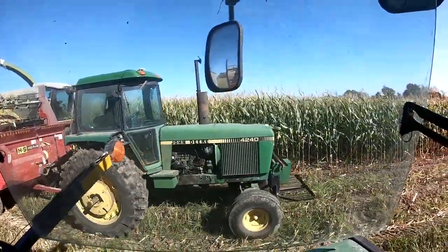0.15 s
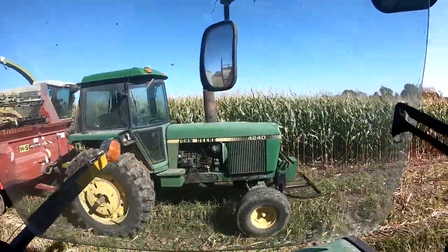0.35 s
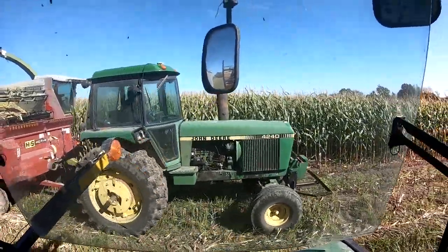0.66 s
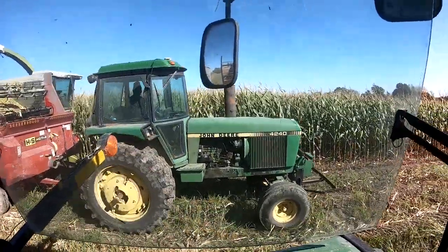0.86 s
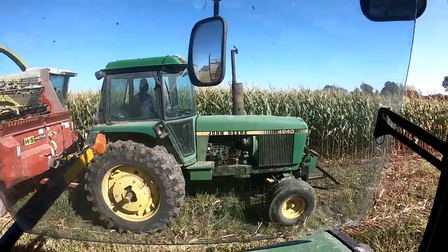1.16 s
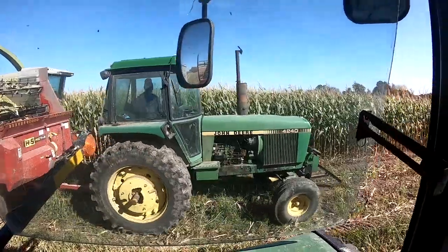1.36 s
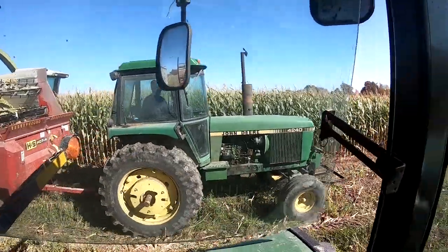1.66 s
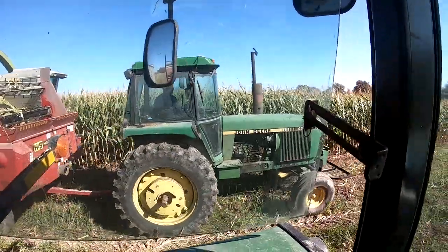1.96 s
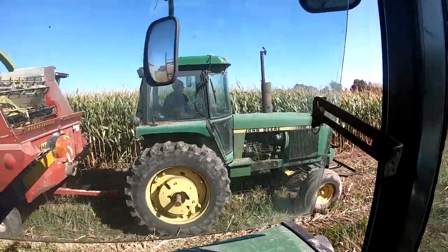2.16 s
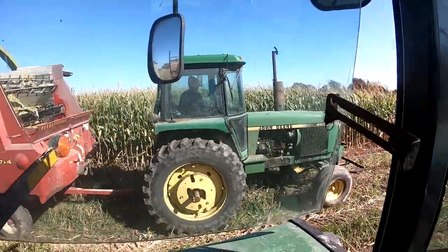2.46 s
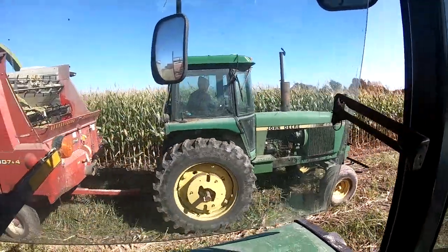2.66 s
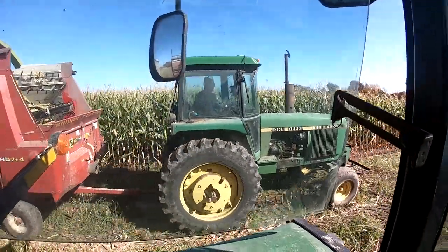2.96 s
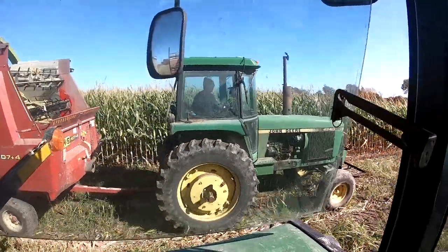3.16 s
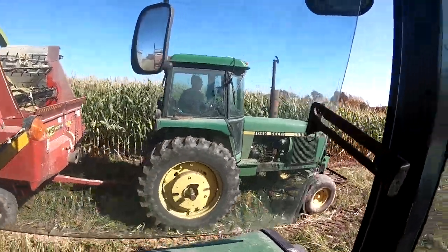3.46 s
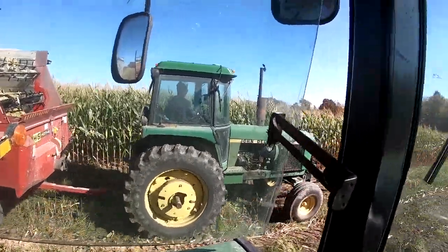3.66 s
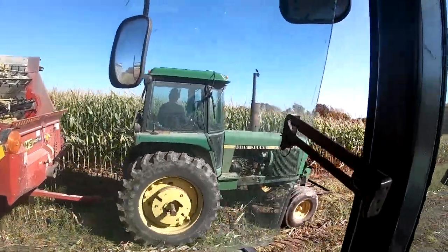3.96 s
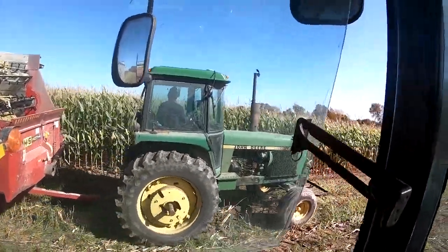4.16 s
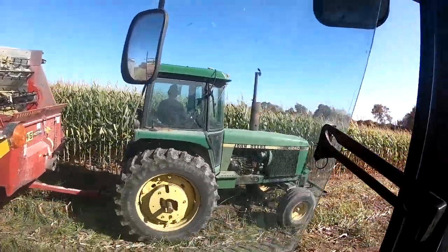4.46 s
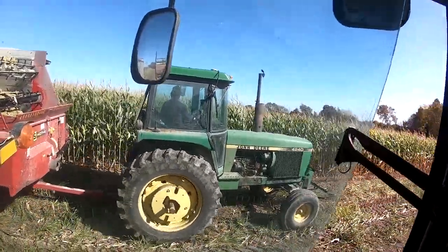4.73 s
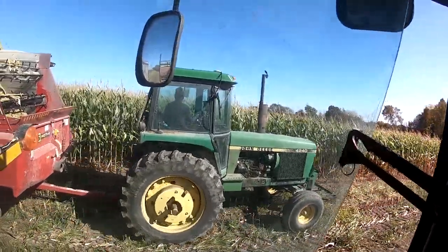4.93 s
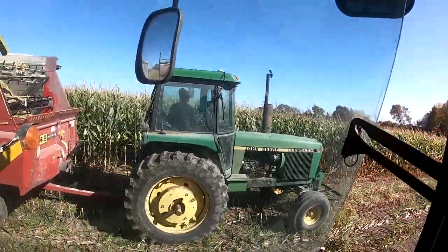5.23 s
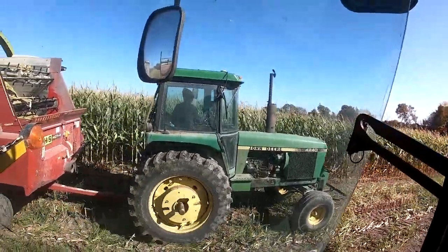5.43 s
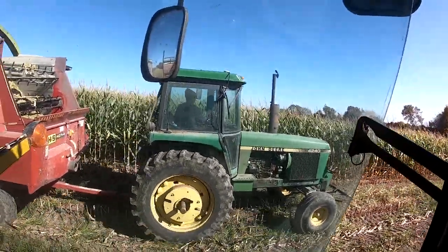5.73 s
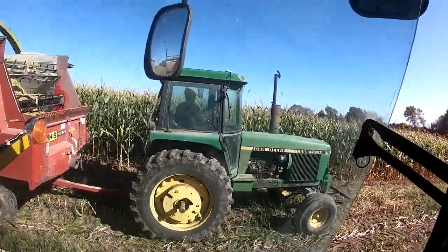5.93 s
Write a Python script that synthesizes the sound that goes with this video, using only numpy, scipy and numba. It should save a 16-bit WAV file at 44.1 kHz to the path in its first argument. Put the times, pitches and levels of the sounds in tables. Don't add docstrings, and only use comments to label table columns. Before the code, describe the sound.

Heard inside a tractor cab beside a working forage harvester in a corn field, in stereo with dulled extreme treble. From 0 s a deep diesel boom near 44 Hz dominates over a wavering cutter drone near 186 Hz, a faint second engine, surging panel hum and broad fan and crop roar. From 0.15 to 1.4 s dry joints give tiny squeaks and loose metal clacks sharply, thickest around 0.4-0.55 s and again near 0.9 and 1.1 s; faint clanking rubs follow near 1.75 s. At about 1.9-2.2 s the engine sags to 37 Hz, its boom cutting out briefly. It labours until 3.3 s, then climbs quickly, passing its first speed at 3.5 s and reaching 50 Hz by 4.7 s. From 4.4 s a whine near 966 Hz emerges; roar and throbbing housing ring grow, loudest around 5.4 s, continuing to 6 s with only rare soft knocks.

```python
import sys
import numpy as np
from scipy import signal
from scipy.fft import rfft, irfft
from scipy.io import wavfile
from scipy.ndimage import uniform_filter1d
from numba import njit

SR = 44100
rng = np.random.default_rng(int(sys.argv[2]) if len(sys.argv) > 2 else 0)


def invert_db(x):
    u = np.asarray(x, float) / 20
    return 10 ** u


def store_pcm(level_fs):
    pcm = np.round(np.clip(level_fs, -1, 1) * 32767).astype(np.int16)
    wavfile.write(sys.argv[1], SR, np.atleast_2d(pcm).T)


N = 268569
T = np.arange(N) / SR
CRUISE_HZ = 44.5

# t/s, firing rate f/Hz, boom level/dB
ENGINE = [(0, 43.92, -14.5), (.55, 43.8, -15.5), (.8, 44.23, -15.5), (.95, 44.1, -14), (1.17, 43.96, -13.5),
          (1.42, 43.85, -17), (1.75, 43.57, -15), (1.92, 42.1, -17), (2.03, 37.42, -16),
          (2.4, 36.76, -12.5), (2.55, 38.16, -15.5), (3.15, 38.73, -15), (3.44, 40.82, -13.5),
          (3.55, 44.98, -14.5), (3.83, 45.1, -16), (3.93, 48.1, -14.5), (4.7, 50.6, -16.5),
          (6.09, 50.2, -17.5)]


def unit(x):
    return x / np.sqrt(np.mean(x ** 2))


def curves(table):
    s, *columns = np.transpose(table)
    return [np.interp(T, s, c) for c in columns]


def at(table, hz):
    f, v = np.transpose(table)
    return np.interp(np.log(hz + 1), np.log(f + 1), v)


def bump(s, half):
    return np.exp(-((T - s) / half) ** 2)


@njit
def svf(x, hz, width):
    y, b, l = np.empty(len(x)), 0., 0.
    g, k = np.tan(np.pi * hz / SR), width / hz
    for i in range(len(x)):
        v = (b + g * (x[i] - l)) / (1 + g * (g + k))
        b, l, y[i] = 2 * v - b, l + 2 * g * v, k * v
    return y


def walk(rate):
    k = int(SR / rate)
    held = np.repeat(rng.standard_normal(N // k + 1), k)
    return 1.33 * uniform_filter1d(uniform_filter1d(held, k), k)[:N]


def tone(turns, db, flutter_db, slip):
    phase = 2 * np.pi * turns + slip * walk(8) + 6 * rng.random()
    return np.sqrt(2) * invert_db(db + flutter_db * walk(12)) * np.sin(phase)


def pan(x, left_db):
    return x * invert_db(np.array([[left_db], [-left_db]]) / 2)


def engine():
    orders = [(1.5, -31, 0.7), (2, -22, 0.13), (3, -25, -.5), (4, -27, -2.3)]
    # t/s, half width/s, depth/dB
    boom_dips = [(0.049, 0.018, -4), (.24, 0.024, -3), (.74, 0.018, -3.5), (1.0, 0.018, -10),
                 (1.94, 0.024, -7.5), (2.015, 0.025, -15), (2.205, 0.018, -23), (2.48, 0.023, -3),
                 (2.61, 0.024, -5.5), (3.54, .025, -3), (3.731, 0.02, -3), (3.89, 0.028, -4),
                 (4.75, .02, -3.5), (5.16, 0.018, -2), (5.86, 0.012, -7)]
    hz, db = curves(ENGINE)
    turns = np.cumsum(hz) / SR
    dips_db = sum(depth_db * bump(s, half) for s, half, depth_db in boom_dips)
    out = tone(turns, db + dips_db, flutter_db=1.0, slip=0.083)
    labour_db = -.8 * np.minimum(hz - CRUISE_HZ, 0)
    over_hz = np.maximum(hz - CRUISE_HZ, 0)
    for k, under_db, slope in orders:
        out += tone(k * turns, db + under_db + labour_db + slope * over_hz, flutter_db=2.5, slip=0.11)
    return out


def drum():
    # t/s, knife rate f/Hz
    speed = [(0, 186.5), (.6, 186.6), (1.2, 189.7), (1.8, 186.3), (2.1, 185), (2.9, 186.9), (3.9, 185.2),
             (6.09, 186.9)]
    # start level/dB, end level/dB
    resting = [(-38, -41.5), (-47, -40.5), (-48.5, -48.5), (-46, -46)]
    # t/s, multiple that swells, half width/s, rise/dB
    bites = [(.15, 1, 0.2, 5), (.6, 1, 0.35, 4.5), (1.2, 1, 0.27, 5.5), (1.65, 1, 0.071, 9.5),
             (1.98, 1, 0.13, 13.5), (2.2, 1, 0.095, 7), (2.4, 1, 0.044, 9), (2.8, 1, 0.26, 6),
             (3.2, 1, .15, -1), (3.79, 1, 0.06, 13), (4.0, 1, 0.068, 8), (4.33, 1, 0.072, 7.5),
             (4.62, 1, 0.058, 9), (4.9, 1, .1, 10), (5.36, 1, 0.082, 6), (5.62, 1, 0.15, 10.5),
             (5.88, 1, 0.058, 11), (1.9, 2, .2, 3.5), (2.27, 2, 0.093, 6.5), (2.55, 2, 0.083, 9.5),
             (2.85, 2, 0.15, 6.5), (3.3, 2, 0.15, 6.5), (3.9, 2, 0.08, 7), (4.13, 2, 0.079, 5),
             (4.61, 2, .05, 7), (5.03, 2, 0.12, 12), (5.2, 2, 0.061, 9.5), (5.42, 2, 0.099, 8.5),
             (5.75, 2, 0.11, 9), (.55, 3, 0.34, 9), (1.57, 3, 0.068, 12.5), (2.1, 3, 0.44, 7),
             (3.3, 3, 0.098, 7.5), (4.55, 3, 0.14, 5), (5.05, 3, 0.091, 6), (5.42, 3, 0.097, 3),
             (.3, 4, 0.11, 9.5), (.7, 4, 0.28, 8), (1.05, 4, 0.18, -1), (1.38, 4, .08, 4),
             (1.8, 4, 0.14, 11), (2.04, 4, 0.075, 11), (2.2, 4, 0.052, 6), (2.42, 4, 0.051, 9),
             (2.8, 4, 0.23, 5.5), (3.1, 4, 0.11, 7.5), (3.88, 4, .07, 6.5), (4.15, 4, 0.11, 11),
             (4.48, 4, 0.067, 7), (5.45, 4, 0.15, 9), (5.75, 4, 0.065, 7.5), (5.97, 4, .08, 10)]
    turns = np.cumsum(curves(speed)[0]) / SR
    out = 0
    for k, ends in enumerate(resting):
        db = np.linspace(*ends, N) + 2.28 * walk(30)
        db += sum(rise_db * bump(s, half) for s, m, half, rise_db in bites if round(m) == k + 1)
        out = out + pan(tone((k + 1) * turns, db, flutter_db=1.54, slip=0.38 + 0.22 * k), -.7 * k)
    return out


def second_diesel():
    return tone(108.7 * T, np.linspace(-34, -30, N) + 1.5 * walk(5.9), flutter_db=1.5, slip=0.058)


def shaft_shake():
    return tone(31.1 * T, -37 + 2.5 * walk(2.9), flutter_db=2.0, slip=1.04)


def blower():
    # t/s, rise/dB, hum f/Hz
    surges = [(0, 17, 131.3), (.27, 11, 131.2), (.51, 6.5, 136.6), (.78, 12, 138.8), (.92, 9, 133),
              (1.09, 14.5, 142), (1.36, 11, 139.2), (1.59, 9, 139.3), (1.74, 6, 138.6), (1.89, 15, 138.1),
              (2.07, 13, 138), (2.22, 8.5, 132.2), (2.36, 9, 137.6), (2.6, 9, 133.8), (2.74, 11.5, 137.8),
              (2.99, 9, 139.3), (3.15, 4.5, 138.6), (3.6, 2.5, 141), (3.87, 9, 137.1), (4.05, 8, 130.1),
              (4.182, 10.5, 139.6), (4.32, 9, 139), (4.52, 7, 138.5), (4.66, 6.5, 137), (4.78, 9.5, 136.2),
              (4.9, 11.5, 137), (5.07, 5, 137.9), (5.29, 9, 137.9), (5.42, 11, 137.8), (5.6, 5, 137.6),
              (5.78, 9, 135.7), (5.9, 7.5, 136.6), (6.09, 0, 131.9)]
    surge_s = 0.069
    db = np.linspace(-43.5, -29, N) + sum(rise_db * bump(s, surge_s) for s, rise_db, _ in surges)
    return tone(np.cumsum(curves(surges)[1]) / SR, db, flutter_db=1.06, slip=0.4)


def gears():
    # f/Hz, bandwidth/Hz, start level/dB, end level/dB
    lines = [(242.5, 11.3, -42, -35.5), (296, 3.4, -42.5, -49.5), (306, 3.6, -49, -48),
             (325, 7.8, -50.5, -43.5), (1126, 6, -46.5, -47.5)]
    mesh_hz, idle_db, loaded_db = 966, -61, -42
    bites_s, rise_s, throb_s = 4.406, 0.11, 0.58
    db = idle_db + (loaded_db - idle_db) / (1 + np.exp((bites_s - T) / rise_s))
    db += 1.2 * walk(33) + 1.7 * np.cos(2 * np.pi * (T - 4.7) / throb_s)
    out = pan(tone(mesh_hz * T, db, flutter_db=0.5, slip=0.92), -2.5)
    for hz, width, start_db, end_db in lines:
        out += invert_db(np.linspace(start_db, end_db, N)) * unit(svf(rng.standard_normal(N), hz, width))
    return out


def roar():
    # t/s, level/dB
    swell = [(0, -33), (1.04, -33.5), (1.37, -33), (1.8, -33), (2.36, -33), (2.7, -35), (3.3, -34.5),
             (3.68, -35.5), (4, -31.5), (4.7, -31), (5.4, -28.5), (6.09, -29.5)]
    # f/Hz, spectral level/(dB per Hz)
    colour = [(10, -58), (20, -57), (28, -48.5), (60, -62.5), (120, -50.5), (210, -57), (300, -62),
              (450, -64), (750, -62), (1300, -65), (2500, -71), (3600, -77), (4200, -81), (8500, -86),
              (9800, -93), (11200, -107), (13500, -113), (15000, -128)]
    # f/Hz, share 0-1
    likeness = [(200, 1), (400, 0.84), (600, 0.71), (1000, 0.18), (1500, 0.43), (3500, 0.7), (4500, 0.54),
                (6500, 0.26), (10500, 0.24), (13000, 0.1)]
    # f/Hz, left over right level/dB
    left_more = [(60, 4), (110, 4.5), (190, -1), (340, -0.5), (600, -2.0), (1060, -3.5), (1880, -2.5),
                 (3340, -2.5), (5930, 1.5), (10500, -1.5)]
    shaft_hz = 15.55
    top_follows = 0.83
    hz = np.fft.rfftfreq(N, 1 / SR)
    one, other = (rfft(rng.standard_normal(N)) for _ in range(2))
    like = np.clip(at(likeness, hz), 0, 1)
    right = like * one + np.sqrt(1 - like ** 2) * other
    side_db = at(left_more, hz) / 2
    pair = np.array([one * invert_db(side_db), right * invert_db(-side_db)]) * invert_db(at(colour, hz))
    scale = np.sqrt(np.mean(irfft(pair * (hz > 400) * (hz < 1400), N) ** 2))

    level_db, = curves(swell)
    engine_hz = curves(ENGINE)[0]
    labour_hz = np.maximum(CRUISE_HZ - engine_hz, 0)
    presence_db = 0.32 * labour_hz + (top_follows - 1) * level_db
    treble_db = 0.29 * labour_hz + (top_follows - 1) * level_db
    firing = np.cos(2 * np.pi * np.cumsum(engine_hz) / SR)
    beat = np.cos(np.pi * shaft_hz * T + .4 * walk(2)) ** 6
    grit = walk(40)
    out = 0
    for centre in 11.25 * 2 ** np.arange(0, 11, .5):
        window = np.cos(np.pi * np.clip(np.log2(hz / centre + 1e-9), -.5, .5)) ** 2
        high = np.clip(np.log2(centre / 1200) / 1.7, 0, 1)
        low = np.clip(np.log2(centre / 80) / 3.8, 0, 1)
        db = low * level_db + (1 - low) * level_db.mean()
        tilt_db = presence_db if centre < 3800 else treble_db
        db = db + (centre > 1400) * (tilt_db - tilt_db.mean())
        db = db + 0.9 * (700 < centre < 2000) * firing
        db = db + high * (0.87 * grit + 0.63 * beat) + 0.46 * walk(9.3)
        out = out + invert_db(db) * irfft(pair * window, N) / scale
    return out


def housing():
    # f/Hz, bandwidth/Hz, start level/dB, end level/dB
    resonances = [(1021, 120, -60, -39.5), (1320, 126, -43.5, -53), (2368, 275, -49, -51)]
    cylinders, peak_s = 6, 5.72
    turns = np.cumsum(curves(ENGINE)[0]) / SR
    cycle = 2 * np.pi * (turns - turns[int(peak_s * SR)]) / cylinders
    throb_db = 6 * np.cos(cycle) + 3 * np.cos(cylinders * cycle)
    out = 0
    for hz, width, start_db, end_db in resonances:
        knocks = rng.standard_normal((2, N)) * (rng.random(N) < .02)
        knocks *= invert_db(1.4 * rng.exponential(size=N))
        ring = []
        for k in (knocks[0], 0.5 * knocks[0] + knocks[1]):
            for spread in (1, 1.9, 1.9):
                k = svf(k, hz, spread * width)
            ring.append(unit(k))
        db = np.linspace(start_db, end_db, N) + throb_db + 1.2 * walk(18)
        out = out + np.array(ring) * invert_db(db)
    return pan(out, -1.9)


def squeaks():
    # t/s, length/s, f/Hz, level/dB, octave level/dB
    slips = [(0.152, 0.022, 2285, -28.5, -31), (.375, 0.012, 8000, -42, -34),
             (0.4815, 0.010, 1780, -26, -36), (0.494, 0.014, 1855, -27.5, -36),
             (0.506, 0.016, 1820, -33, -38), (1.034, 0.068, 1330, -33, -31), (0.546, 0.018, 7900, -39, -27),
             (0.955, 0.016, 1320, -27, -12), (1.246, 0.018, 6480, -35.5, -40),
             (1.253, 0.016, 3280, -33.5, -32), (1.781, 0.031, 1620, -28.5, -26),
             (2.14, 0.076, 7850, -43, -36)]
    out = np.zeros(N)
    for s, length, hz, db, octave_db in slips:
        t = np.arange(int(length * SR)) / SR
        jitter = np.cumsum(0.12 * uniform_filter1d(rng.standard_normal(4410), size=16))[:len(t)]
        phase = 2 * np.pi * hz * t + jitter
        shape = np.abs(np.sin(np.pi * (t / length) ** 0.71)) ** 0.76
        wave = np.sin(phase) + invert_db(octave_db) * np.sin(2 * phase)
        out[int(s * SR):int(s * SR) + len(t)] += invert_db(db) * shape * wave
    return pan(out, -2.5)


def clacks():
    # t/s, peak level/dB, thud under 1.5 kHz/dB, clank 1.5-3 kHz/dB, ring of the struck part f/Hz
    blows = [(0.154, -36, 3, 7, 6000), (.2268, -23.5, -5, -1, 6700), (.4215, -18, -10, -11, 6560),
             (.4345, -29, -2, -7, 6000), (.4808, -18, -10, -13, 7800), (.4875, -28, 2, 1, 4600),
             (.4975, -38, -3, 2, 7800), (.5045, -36, -1, 2, 5000), (.5461, -34, 5, -4, 7750),
             (.6294, -41, 4, -2, 7000), (0.87, -23, -8, -11, 7300), (.8894, -31, 2, 2, 7400),
             (1.0975, -26, -4, -7, 5900), (1.1101, -24, 4.5, -11, 7700), (1.1155, -29.5, 7, -2, 7200),
             (1.124, -38, 3, 0, 8500), (1.132, -36, 6, 2, 7000), (1.2506, -31, -6, -8, 9800),
             (1.31, -41, -3, -7, 7000), (1.3696, -39.5, -3, 12.5, 7000), (1.5746, -39.5, -11, 10.5, 7000),
             (1.7555, -41, 13, 12, 4400), (1.778, -46, 5, 12, 4400), (2.4219, -41, 7, 1, 5623),
             (3.2289, -36, 6, -5, 5695), (4.0527, -42, 6, -5, 5254), (5.4896, -36, 6, 1, 6960)]
    # t at the middle/s, half width/s, peak level/dB, clank/dB, ring f/Hz
    scrapes = [
        (.491, 0.0059, -32.5, 5.5, 4940),
        (1.107, 0.014, -34, -5, 6500),
        (.911, 0.011, -37.5, 2, 7640),
        (1.148, 0.013, -40.5, 0, 7500),
        (1.73, 0.0069, -41, -3, 5970),
        (1.79, 0.02, -44, 13.5, 4400),
        (2.125, 0.022, -47, 13.5, 4150),
        (2.335, 0.019, -43.5, 4, 4470),
    ]
    # f/Hz, bandwidth/Hz, level/dB
    body_modes = [(740, 140, 8), (1140, 230, 2), (1790, 280, 5.5), (2720, 710, -1), (3780, 1500, -6),
                  (4700, 500, -12), (6700, 4400, 0.5), (7900, 690, -13), (9800, 1600, -16)]
    out = np.zeros((2, N))
    t = np.arange(8000) / SR
    decay = 1000. ** (-t / 0.035) + invert_db(-12.5) * 1000. ** (-t / 0.16)
    blow = (1 - np.exp(-(t / 0.0025) ** 1.6)) * decay
    events = [(*row, blow) for row in blows]
    for s, half, db, clank_db, hz in scrapes:
        events.append((s - 2 * half, db + 0.5, 0, clank_db, hz, np.exp(-(t / half - 2) ** 2)))
    for s, db, thud_db, clank_db, ring_hz, shape in events:
        knocks = invert_db(1.1 * np.repeat(rng.standard_normal(100), 80))
        burst = rng.standard_normal((2, len(t))) * knocks
        burst[1] = 0.49 * burst[0] + 0.68 * burst[1]
        top_db = 8 * min(ring_hz - 7300, 0) / 1000
        ring = 0
        for f, width, mode_db in body_modes + [(ring_hz, 900, -5)]:
            part_db = thud_db if f < 1500 else clank_db if f < 3000 else 0 if f < 6000 else top_db
            gain = invert_db(mode_db + 1.5 * rng.standard_normal() + part_db)
            ring = ring + gain * np.array([unit(svf(b, f, width)) for b in burst])
        out[:, int(s * SR):int(s * SR) + len(t)] += pan(ring * shape * invert_db(db - 9.5), -1)
    hz = np.fft.rfftfreq(N, 1 / SR)
    shade_db = at([(9500, 1.5), (11000, -7), (12500, -19), (15000, -23)], hz)
    return irfft(rfft(out) * invert_db(shade_db), N)


def scene():
    drone = engine() + drum() + second_diesel() + shaft_shake() + blower() + gears()
    return drone + roar() + housing() + squeaks() + clacks()


def roll_off(x):
    return signal.sosfilt(signal.butter(12, 15200, fs=SR, output="sos"), x)


def record(dry):
    # f/Hz, phase lead of the left port/rad
    left_lead = [(30, -.3), (44, -.23), (75, -.13), (190, -.04), (4000, 0), (5500, -.6), (7500, -1.6),
                 (9500, -2.9), (10800, -3.2), (12500, -5)]
    margin = SR // 10
    padded = np.pad(dry[1], margin, mode="reflect")
    lag = at(left_lead, np.fft.rfftfreq(len(padded), 1 / SR))
    right = irfft(rfft(padded) * np.exp(-1j * lag), len(padded))[margin:][:N]
    ports = np.array([dry[0], right])
    return roll_off(np.tanh(.8 * ports) / .8)


dry = scene()
out = record(dry)
store_pcm(out)
```